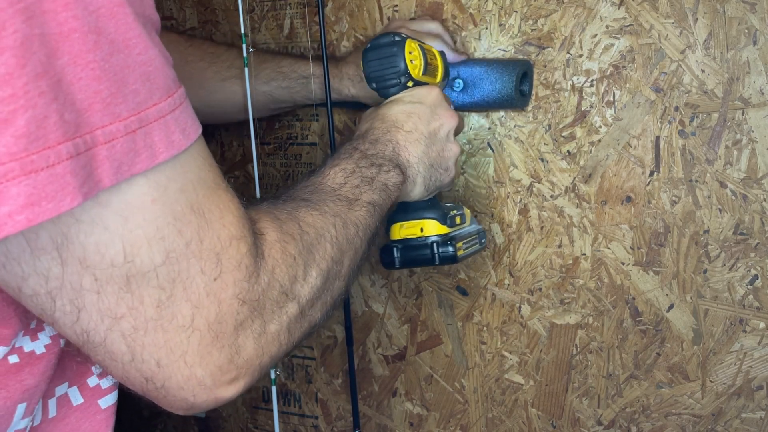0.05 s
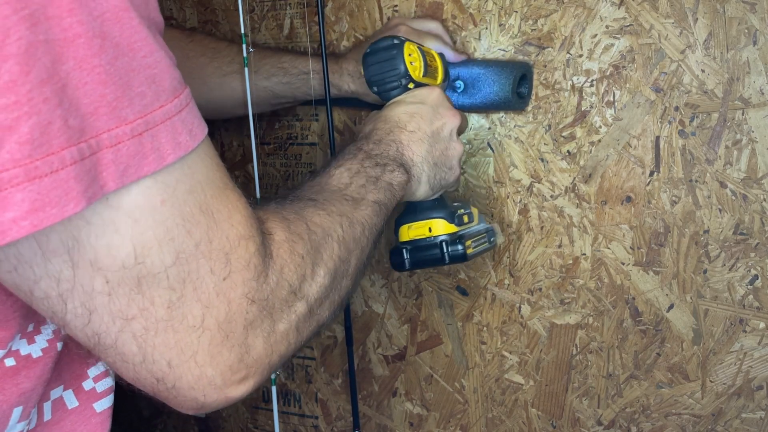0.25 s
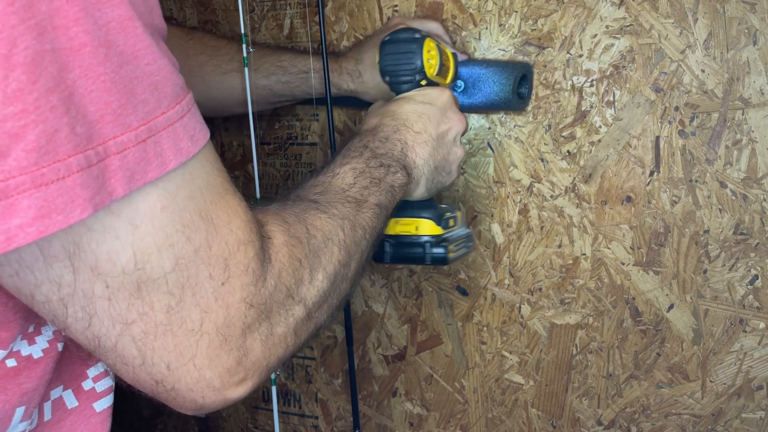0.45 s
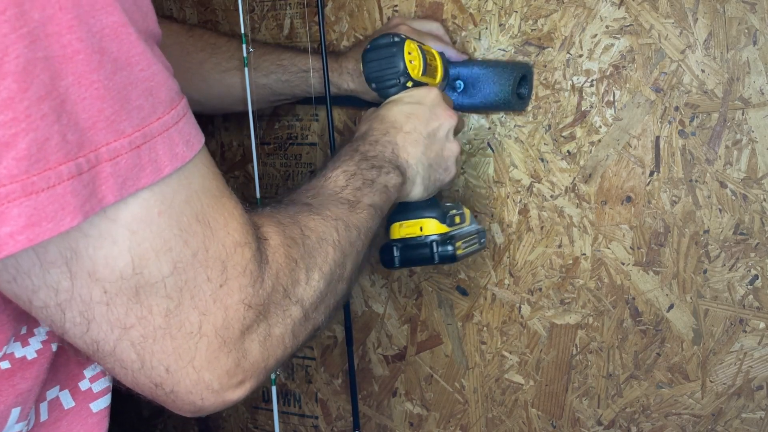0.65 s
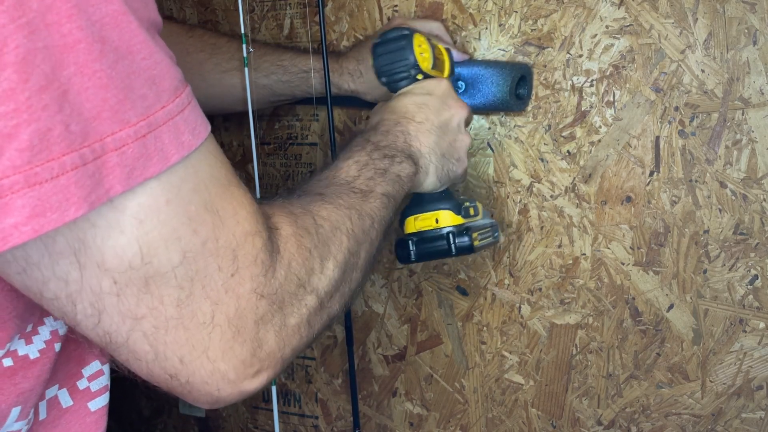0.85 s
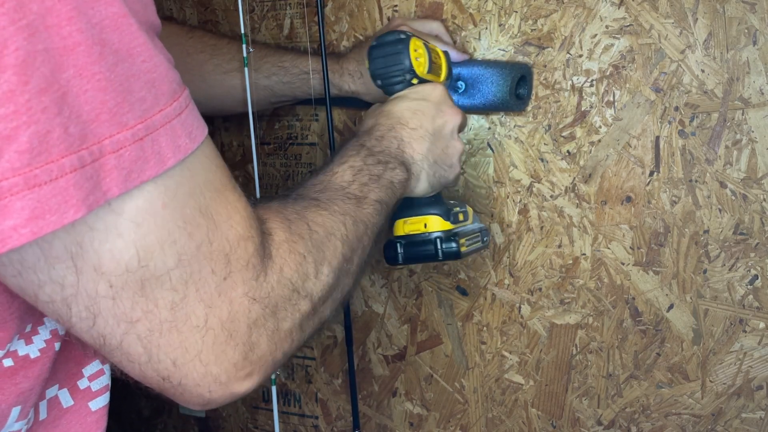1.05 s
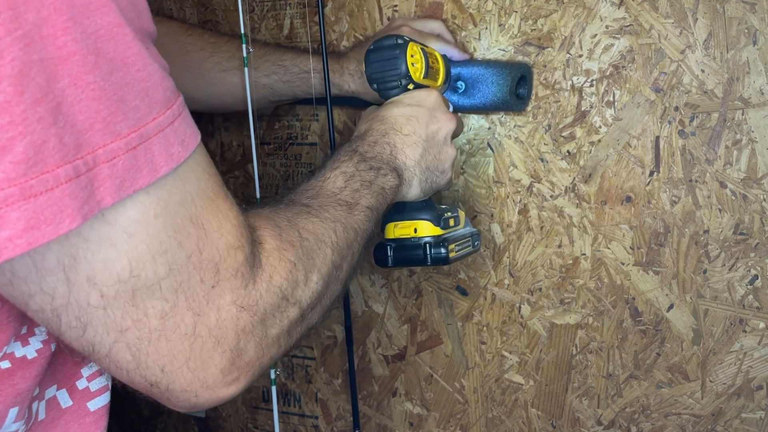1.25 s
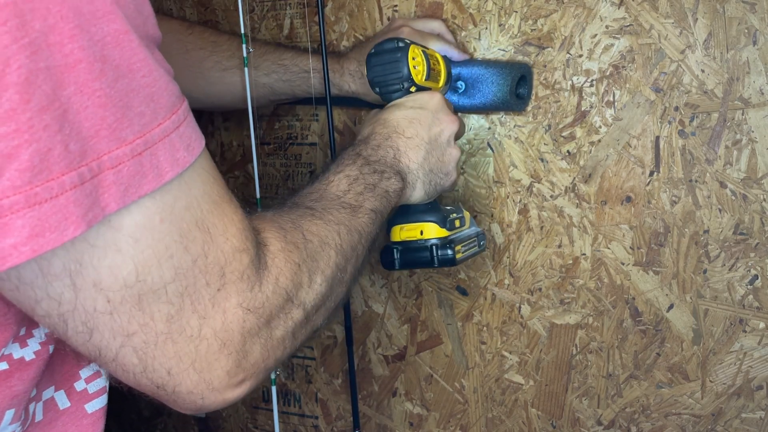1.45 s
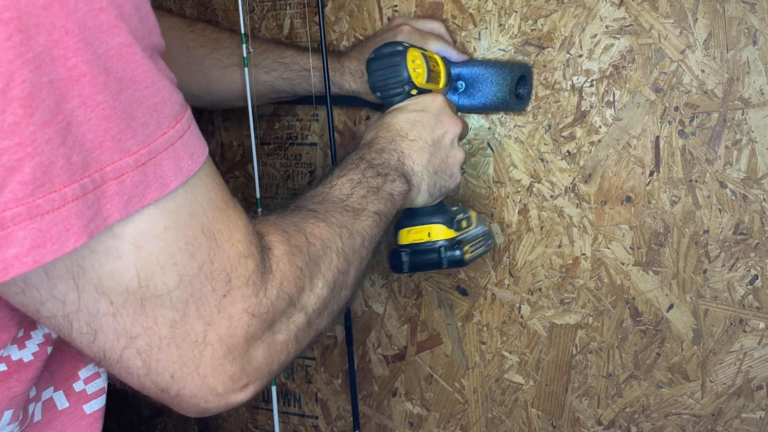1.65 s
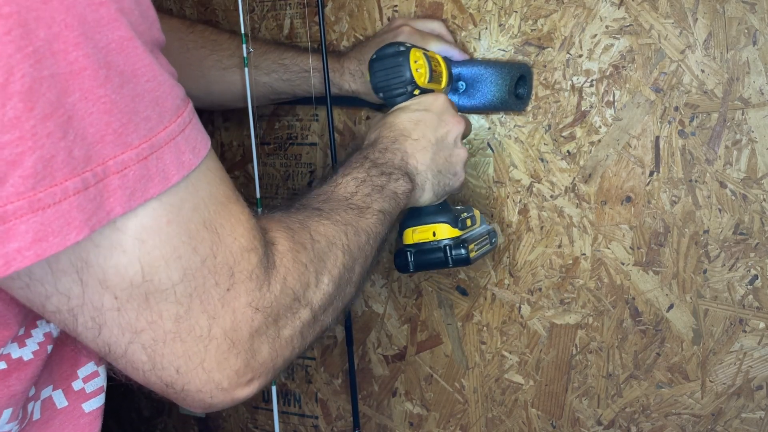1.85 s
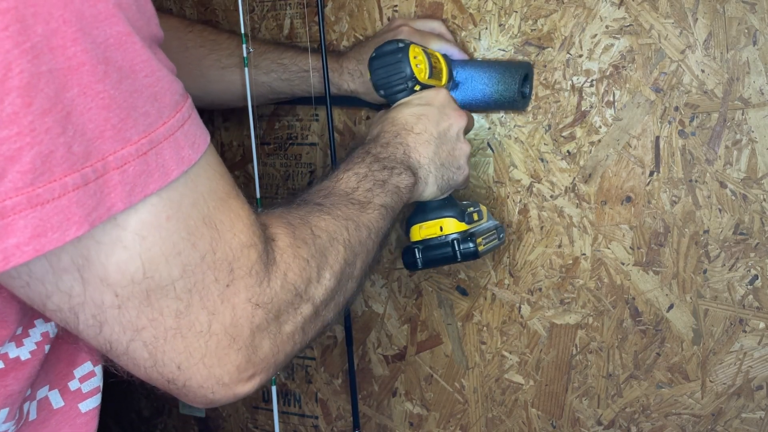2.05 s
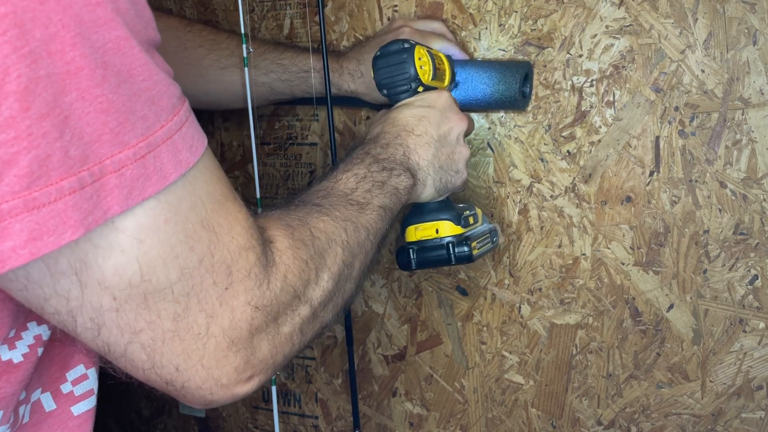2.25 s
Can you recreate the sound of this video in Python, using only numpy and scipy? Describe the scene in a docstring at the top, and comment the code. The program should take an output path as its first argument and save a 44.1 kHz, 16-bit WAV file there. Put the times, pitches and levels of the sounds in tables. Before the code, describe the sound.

A cordless impact driver turns a screw into a wooden board in four short bursts of whine and clatter, two, a pause, then two slower ones. Thin whistles, knocks and trigger ticks surround them, close by in a quiet garage.

```python
"""A cordless impact driver nudges a screw into a board in four short pulls, close by in a quiet garage.
First the speed controller whistles, hammer and bit knock in the screw head, and tool and board shudder.
Trigger and grip tick. Then the gears whine up and clatter until the brake stops them, and the wall rumbles.
Three more pulls follow, each slower than the one before, with whistles, knocks and shudders around them.
A cluster of hard knocks and a few faint ticks end the job."""
import sys
import numpy as np
from scipy import signal
from scipy.fft import rfft, irfft
from scipy.io import wavfile
from scipy.ndimage import uniform_filter1d

SR = 44100
rng = np.random.default_rng(int(sys.argv[2]) if len(sys.argv) > 2 else 0)


def int16_out(signal):
    """Quantize to a 16-bit WAV file."""
    q = np.round(np.clip(np.atleast_2d(signal).T, -1, 1) * 32767)
    wavfile.write(sys.argv[1], SR, q.astype(np.int16))


N = 105840

# Trigger pulls: (start [s], top speed reached [s], drive ends [s], top shaft speed [Hz], level [dB],
# treble [dB], clatter while coasting [dB], fade-in [s])
PULLS = [(0.198, 0.267, .290, 481.8, -26, 1.5, -26, 0.013),
         (0.708, 0.767, 0.801, 461.6, -26.5, 1.5, -21.5, 0.0057),
         (1.684, 1.749, 1.7575, 360.4, -27.5, 1, -28, 0.022),
         (1.967, 2.029, 2.036, 272.6, -28.5, -1.5, -13.5, 0.015)]


def undb(db):
    """Turn decibels into a number to multiply by."""
    return 10 ** (np.asarray(db) / 20)


def unit(x):
    """Scale a signal to an average strength (rms) of 1."""
    return x / np.sqrt(np.mean(x ** 2))


def wander(hz):
    """A smooth random wiggle of size 1; more hz makes it quicker."""
    width = max(int(SR / hz), 2)
    return unit(uniform_filter1d(uniform_filter1d(rng.standard_normal(N), width), width))


def colour(x, points):
    """Shape the tone of x along a curve of (frequency [Hz], level [dB]) points."""
    hz, db = np.array(points, float).T
    size = 4096
    freqs = np.maximum(np.fft.rfftfreq(size, 1 / SR), 1)
    cepstrum = irfft(np.log(undb(np.interp(np.log(freqs), np.log(hz), db))))
    cepstrum[1:size // 2] *= 2  # fold it so the filter rings only after a hit
    cepstrum[size // 2 + 1:] = 0
    response = irfft(np.exp(rfft(cepstrum)))
    return signal.fftconvolve(x, response / np.linalg.norm(response))[:N]


def resonate(x, hz, width_hz):
    """Make x ring at one pitch."""
    return signal.lfilter(*signal.iirpeak(hz, hz / width_hz, fs=SR), x)


def gate(t, on, off, attack, release):
    """A loudness curve that rises after on and dies away after off (all in seconds)."""
    return (1 - np.exp(-np.maximum(t - on, 0) / attack)) * np.exp(-np.maximum(t - off, 0) / release)


def strike(t, at, decay_s, share):
    """A sharp click, then dying chatter that holds the given share of the energy."""
    chatter = rng.standard_normal(N) * (t >= at) * np.exp(-np.abs(t - at) / decay_s)
    out = chatter * np.sqrt(share) / np.linalg.norm(chatter)
    out[int(at * SR)] += np.sqrt(1 - share)
    return out * np.sqrt(.005 * SR)


def garage_air():
    """Still air makes a faint, steady hush."""
    # Tone of the hush: (frequency [Hz], level [dB])
    air = [(15, -33.5), (25, -0.5), (120, -3), (326, -11.5), (354, -14), (394, -3), (516, -4), (695, -7.5),
           (1070, -11), (1260, -16), (2480, -19.5), (2760, -12.5), (4030, -24), (6560, -27), (16000, -30.5)]
    return undb(-64) * colour(rng.standard_normal(N), air)


def controller_whistle(t):
    """Switched current makes the motor's coils whistle while the trigger is barely pressed."""
    # Whistles: (on [s], off [s], starting level [dB], ending level [dB])
    whistles = [(0, .032, -44, -42), (.518, .538, -46, -44), (1.574, 1.70, -55, -50),
                (1.969, 1.98, -50, -47)]
    # Tones at 1, 2, 3 and 4 times the pitch: (level [dB])
    partials = [0, -26, -22, -36]
    pitch_hz = 3936
    tone = sum(undb(db) * np.sin(2 * np.pi * k * pitch_hz * t) for k, db in enumerate(partials, 1))
    loudness = sum(gate(t, on, off, .001, .0017) * undb(np.interp(t, [on, off], [on_db, off_db]))
                   for on, off, on_db, off_db in whistles)
    return unit(tone) * loudness


def hammer_knocks(t):
    """Hammer and bit take up their slack: a hard blow, a thud of the board, a rattle of steel."""
    # Knocks: (time [s], blow [dB], thud [dB], rattle [dB])
    knocks = [(.001, -33, -53.5, -49.5), (0.0187, -29.5, -34, -55), (0.2079, -22, -30.5, -33),
              (0.54, -21, -30, -39), (0.546, -32.5, -31, -48), (0.712, -36.5, -39.5, -32),
              (0.7197, -33, -47, -22.5), (0.7233, -16, -20, -24.5), (.795, -21, -26, -29),
              (1.695, -26.5, -36, -49), (1.7848, -35, -48, -47), (2.09, -37, -37, -32),
              (2.0935, -15, -18, -27), (2.098, -26.5, -27, -31.5), (2.1037, -16, -14, -28.5),
              (2.11, -30.5, -23.5, -50)]
    # Tone of the blow, the board and the steel: (frequency [Hz], level [dB])
    blow_tone = [(80, -29.5), (300, -8), (520, 10), (700, 2), (1000, 1), (1500, -0.5), (2200, -8.5),
                 (3000, -7), (4500, -19), (9000, -34.5), (16000, -44)]
    board_tone = [(40, -20.5), (100, -11), (200, -6), (320, -2), (500, 2), (900, -18.5), (2000, -51),
                  (16000, -88.5)]
    steel_tone = [(100, -26.5), (800, -5.5), (2800, 8), (4500, -4.5), (6500, 3.5), (8000, -9.5),
                  (10500, -3.5), (16000, -12)]
    blow, thud, rattle = np.zeros((3, N))
    for at, blow_db, thud_db, rattle_db in knocks:
        hit = strike(t, at, decay_s=.005, share=.2)
        blow += undb(blow_db) * hit
        thud += undb(thud_db) * hit
        rattle += undb(rattle_db) * strike(t, at, decay_s=.0025, share=.85)
    return colour(blow, blow_tone) + colour(thud, board_tone) + colour(rattle, steel_tone)


def board_shudders(t):
    """Short, rough, rising groans as the turning force twists tool and board."""
    # Shudders: (time [s], length [s], middle pitch [Hz], level [dB])
    shudders = [(.015, 0.084, 139.6, -45), (.25, 0.086, 124.7, -39), (0.336, 0.091, 138.5, -50.5),
                (0.558, 0.086, 121.6, -50), (0.722, 0.053, 130.6, -35), (.78, .05, 151, -35),
                (0.867, 0.034, 146, -38.5), (0.908, 0.023, 128, -49.5), (1.731, 0.094, 118.3, -44.5),
                (1.826, 0.056, 122.4, -44.5), (1.974, 0.039, 126, -39.5), (2.10, 0.032, 195, -48)]
    # Tone of their rough noise: (frequency [Hz], level [dB])
    rub_tone = [(30, -0.5), (80, -13), (125, 6), (200, -2.5), (320, -3.5), (500, -9.5), (1200, -24.5),
                (8000, -72)]
    out = np.zeros(N)
    wobble = 1 + .1 * wander(120)
    rub = undb(-7.5) * colour(rng.standard_normal(N), rub_tone)
    for at, length, hz, db in shudders:
        progress = np.clip((t - at) / length, 0, 1)
        pitch_hz = (progress > 0) * hz * wobble * (1 + .32 * (progress - .5))
        phase = 2 * np.pi * np.cumsum(pitch_hz) / SR
        swell = np.sqrt(np.abs(np.sin(np.pi * progress)))
        out += undb(db) * swell * (np.sin(phase) + undb(-18.5) * np.sin(2 * phase) + rub)
    return out


def trigger_ticks(t):
    """The plastic trigger and grip click: a dull body with a bright snap."""
    # Ticks: (time [s], body [dB], snap [dB])
    ticks = [(.055, -46.5, -82), (0.082, -68, -57.5), (0.127, -54.5, -62), (.143, -51.5, -71),
             (0.153, -50.5, -62), (0.347, -38, -53), (.455, -52, -69), (0.464, -50, -60),
             (.619, -52.5, -55), (0.646, -52.5, -72), (0.656, -54.5, -58), (.90, -59, -55),
             (.92, -65, -59.5), (1.38, -71, -64), (1.522, -53.5, -76), (1.535, -55, -66.5),
             (1.619, -63, -78), (1.655, -56.5, -76), (1.833, -50, -62), (1.919, -51.5, -62),
             (1.929, -54.5, -60.5), (2.272, -47.5, -67), (2.29, -55.5, -78), (2.36, -57.5, -60)]
    # Tone of the body and the snap: (frequency [Hz], level [dB])
    body_tone = [(60, -12), (150, 8.5), (300, -1.5), (700, 0.5), (1500, -4), (2500, 2.5), (4000, -10.5),
                 (7000, -17.5), (16000, -40)]
    snap_tone = [(100, -39), (2000, -3.5), (6000, -3.5), (10000, -7.5), (16000, -14)]
    body, snap = np.zeros((2, N))
    for at, body_db, snap_db in ticks:
        hit = strike(t, at, decay_s=.004, share=.98)
        body += undb(body_db) * hit
        snap += undb(snap_db) * hit
    return colour(body, body_tone) + colour(snap, snap_tone)


def housing_clatter(angle, speed, treble_db):
    """Loose parts hit the tool's shell in step with the shaft, brighter as it speeds up."""
    # Tone of the shell: (frequency [Hz], level [dB])
    housing = [(35, -41.5), (60, -21.5), (124, 1), (308, -10), (540, 0.5), (621, -18.5), (698, 3),
               (1060, -7.5), (1380, -5), (1700, -1.5), (2650, -3), (3420, -0.5), (3940, -0.5), (4640, -7.5),
               (4970, -2.5), (6280, -8.5), (8320, -15), (9790, -8), (16000, -30.5)]
    # Pitches it rings at: (frequency [Hz], width [Hz], level [dB])
    rings = [(518, 30, -3.5), (2800, 400, -3.5), (3950, 260, -8.5), (6450, 400, 3)]
    hits_per_s, treble_hz = 9000, 5400
    hits = (rng.random(N) < hits_per_s / SR) * np.sign(rng.standard_normal(N)) * (1 + rng.random(N))
    body = colour(hits * (1 + .5 * np.sin(angle)), housing)
    body = unit(body + sum(undb(db) * resonate(body, hz, width) for hz, width, db in rings))
    treble = signal.sosfiltfilt(signal.butter(2, treble_hz, "high", fs=SR, output="sos"), body)
    return body + treble * (undb(treble_db) * speed ** .6 - 1)


def motor(t):
    """The shaft spins up and is braked; gear teeth whine at multiples of its speed, over the clatter."""
    # Gear tones; the teeth meet 12 times a turn: (multiple of shaft speed, level [dB])
    gear_tones = [(2, -12), (3, -6), (4, -13), (5, -13), (6, -4), (7, -12), (8, -8), (9, -7), (10, -13),
                  (12, 0), (15, -11), (18, -6), (21, -14), (24, -10)]
    # Whine compared with clatter in each pull: (level [dB])
    whine_levels = [-2.5, -4.5, .5, -5]
    # How well the shell gives off the whine: (frequency [Hz], level [dB])
    shell = [(150, -10.5), (600, -1), (1800, -3), (2900, 1.5), (4100, 2.5), (4600, -2), (5500, 1.5),
             (6500, 0.5), (7600, -11), (10000, -3), (14000, -19.5)]
    brake_s, flutter_db = .125, 4.5
    flutter = [undb(db + flutter_db * wander(170)) for _, db in gear_tones]
    flutter = flutter / np.sqrt(np.sum(np.mean(np.square(flutter), axis=1)) / 2)
    wobble = 1 + .008 * wander(140)
    shell_hz, shell_db = np.array(shell, float).T
    shell_gain = undb(shell_db - np.median(shell_db))
    out = np.zeros(N)
    for (start, top, end, top_hz, db, treble_db, coast_db, attack), whine_db in zip(PULLS, whine_levels):
        spin_up = np.sin(np.pi / 2 * np.clip((t - start) / (top - start), 0, 1))
        braking = np.clip(1 - np.maximum(t - top, 0) / brake_s, 0, 1)
        speed = spin_up * braking  # 0 at rest, 1 at top speed
        angle = 2 * np.pi * np.cumsum(top_hz * speed * wobble) / SR
        drive = gate(t, start, end, attack, release=.013)
        whine = sum(gain * np.interp(k * top_hz * speed, shell_hz, shell_gain) * np.sin(k * angle)
                    for (k, _), gain in zip(gear_tones, flutter))
        clatter = (drive + undb(coast_db)) * speed ** .34 * housing_clatter(angle, speed, treble_db)
        out += undb(db) * (clatter + undb(whine_db) * drive * np.sqrt(speed) * whine)
    return out


def wall_rumble(t):
    """Each pull shakes the wall into a brief, deep rumble."""
    # Tone of the wall: (frequency [Hz], level [dB])
    rumble = [(20, 3), (45, 6), (90, -7.5), (200, -16.5), (1000, -61)]
    shaking = sum(gate(t, start, start + .22, attack=.0083, release=.07) for start, *_ in PULLS)
    return undb(-59.5) * shaking * colour(rng.standard_normal(N), rumble)


def garage_echo(x, t):
    """Sound bounces off the nearby wall, then dies away quickly in the room."""
    # Echo in each band: (centre [Hz], time to fade by 60 dB [s], level [dB])
    room = [(125, .4, -13), (350, 0.14, -12.5), (1000, 0.19, -11.5), (2800, 0.25, -13.5), (5600, 0.32, -16),
            (11000, 0.09, -14)]
    near_wall = rng.standard_normal(N) * gate(t, .0005, .001, attack=.0005, release=.006)
    response = undb(-12) * near_wall / np.linalg.norm(near_wall)
    spectrum = rfft(rng.standard_normal(N))
    log_freqs = np.log(np.maximum(np.fft.rfftfreq(N, 1 / SR), 1))
    log_centres = np.log([hz for hz, *_ in room])
    for (_, fade_s, db), this_band in zip(room, np.eye(len(room))):
        band = irfft(spectrum * np.interp(log_freqs, log_centres, this_band), N)
        fade = gate(t, .0017, .0067, attack=.005, release=fade_s / np.log(1000))
        response += undb(db) * band * fade / np.linalg.norm(fade)
    return signal.fftconvolve(x, response)[:N]


def scene():
    """Add up all the sounds; only motor, knocks and ticks echo."""
    t = np.arange(N) / SR
    gears, knocks, ticks = motor(t), hammer_knocks(t), trigger_ticks(t)
    echo = garage_echo(undb(-.5) * gears + undb(1.5) * knocks + undb(3.5) * ticks, t)
    tool = controller_whistle(t) + knocks + board_shudders(t) + ticks + gears
    return (tool + echo + garage_air() + wall_rumble(t))[None]


def record(dry):
    """Cut away the treble above 16000 Hz."""
    return signal.sosfilt(signal.ellip(8, .2, 70, 16000, fs=SR, output="sos"), dry)


dry = scene()
out = record(dry)
int16_out(out)
```